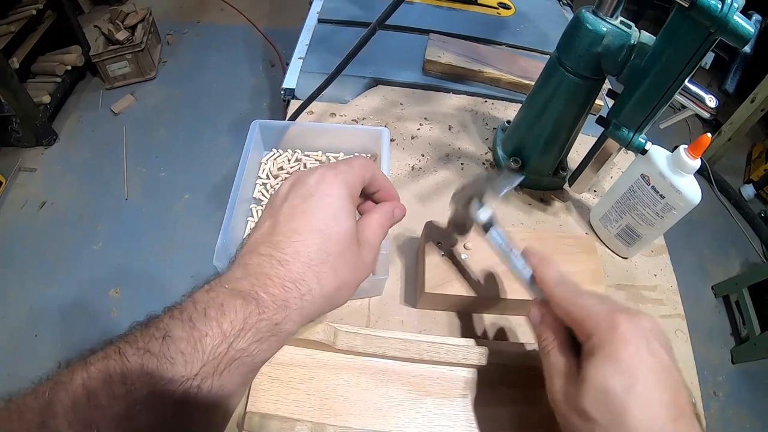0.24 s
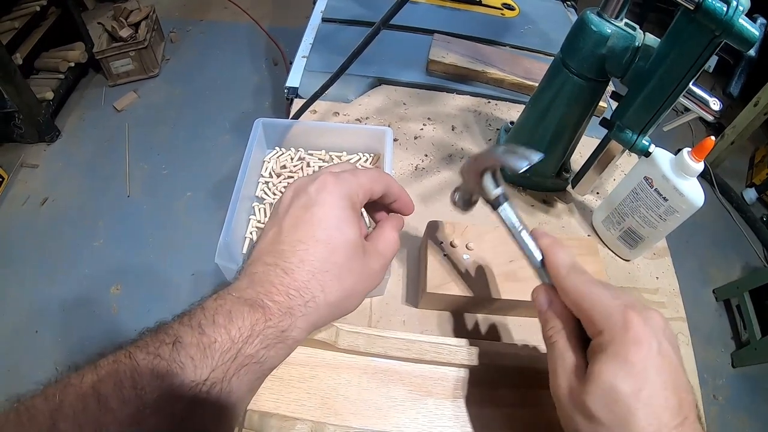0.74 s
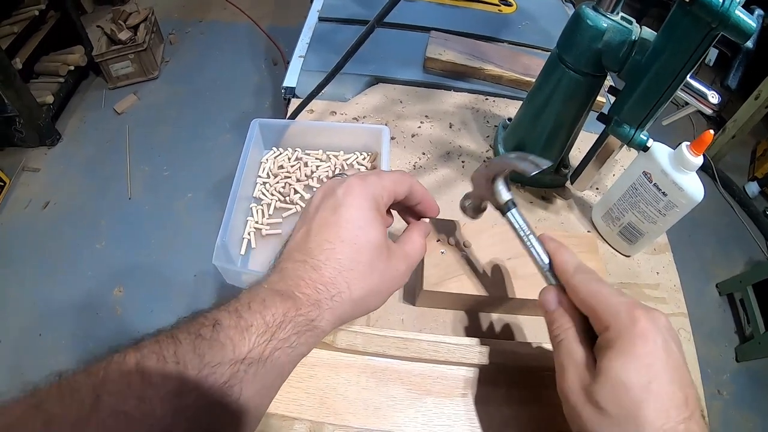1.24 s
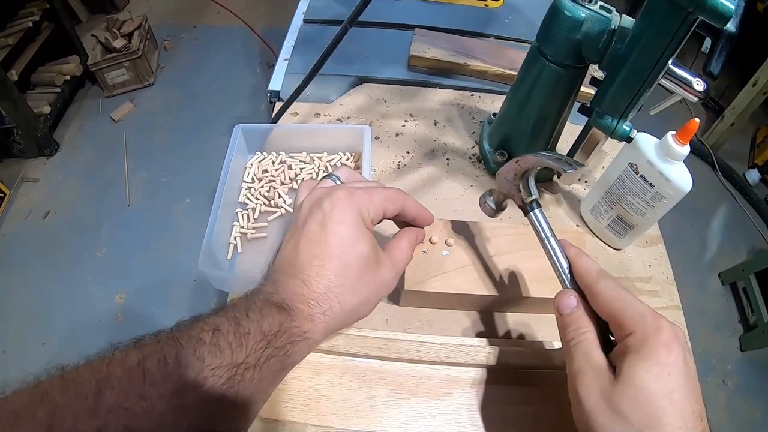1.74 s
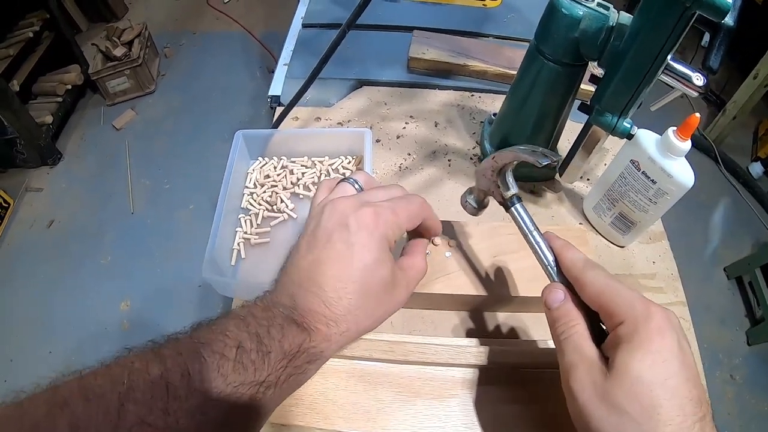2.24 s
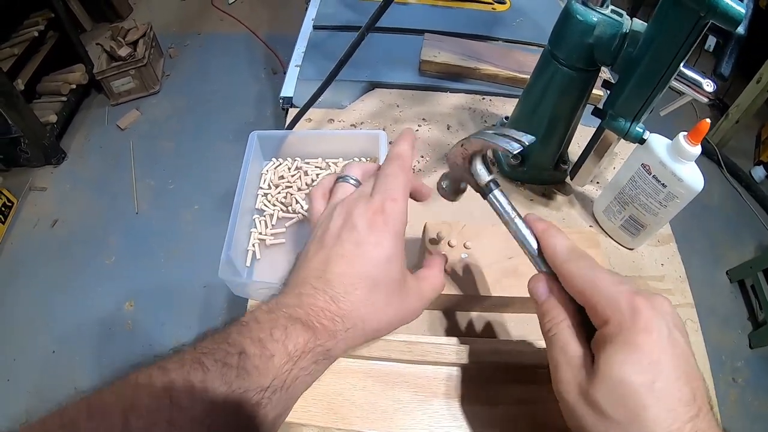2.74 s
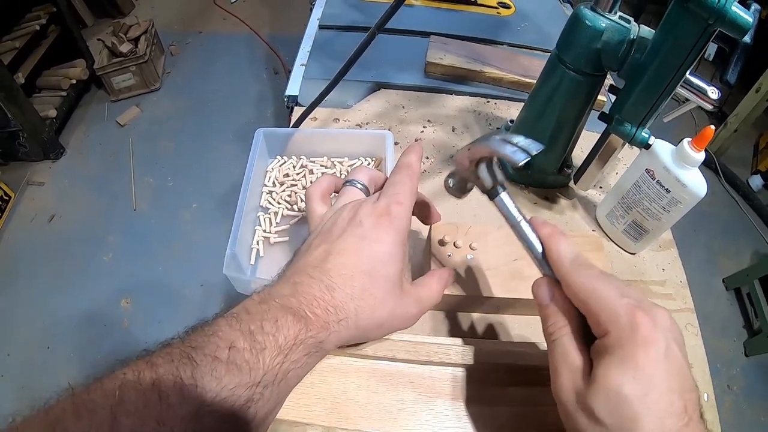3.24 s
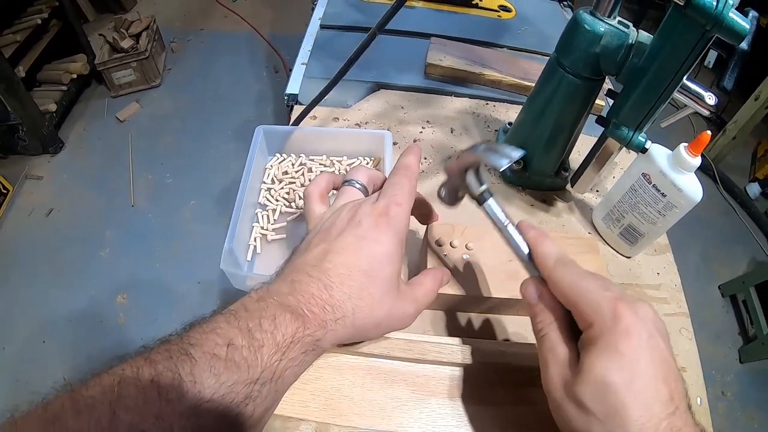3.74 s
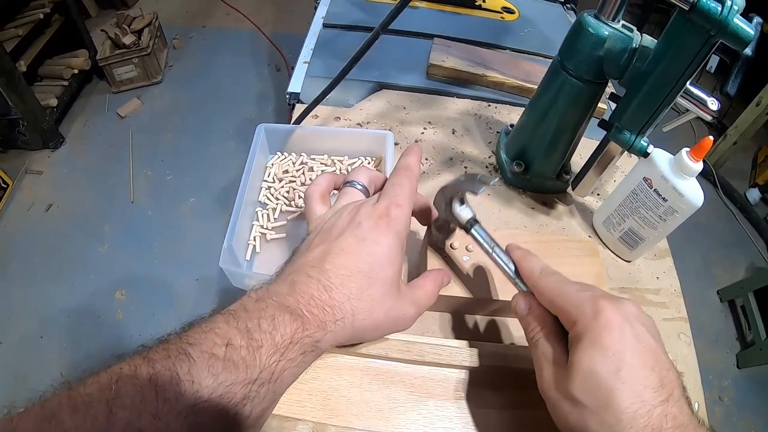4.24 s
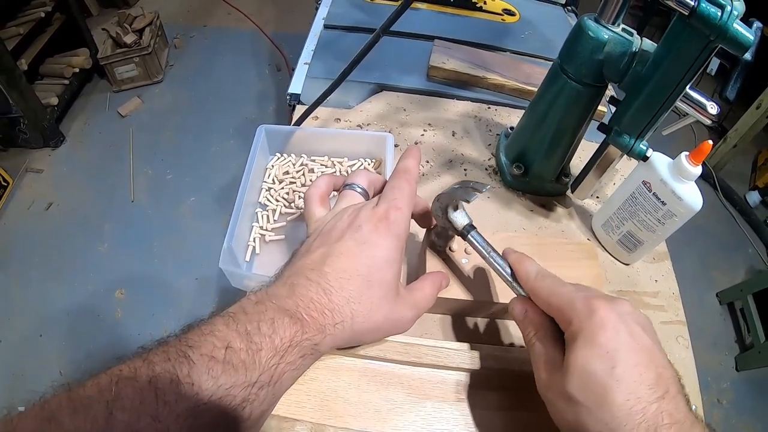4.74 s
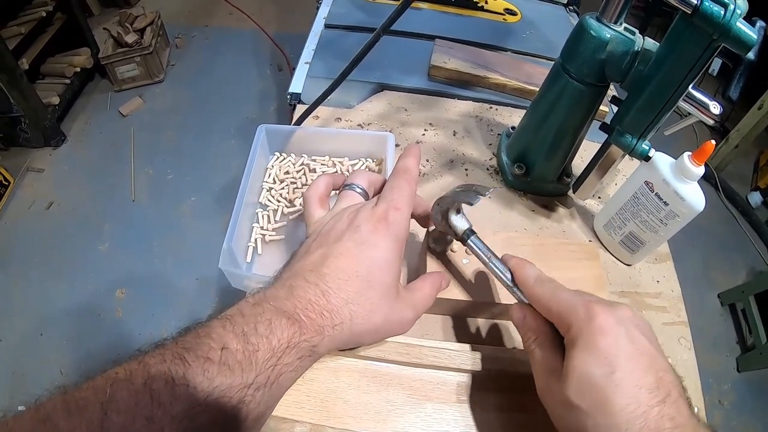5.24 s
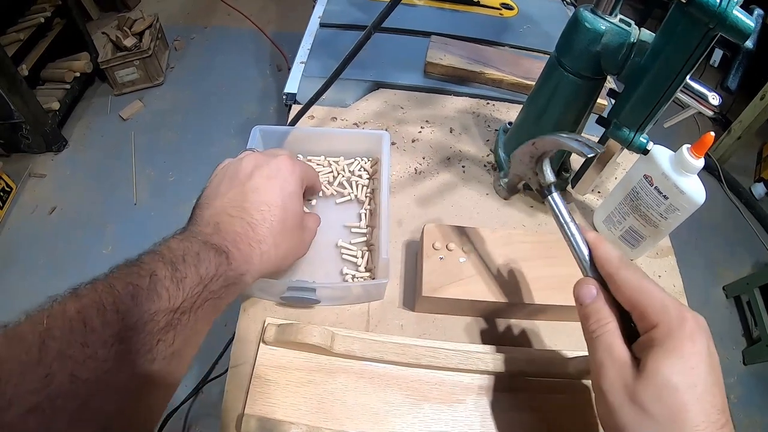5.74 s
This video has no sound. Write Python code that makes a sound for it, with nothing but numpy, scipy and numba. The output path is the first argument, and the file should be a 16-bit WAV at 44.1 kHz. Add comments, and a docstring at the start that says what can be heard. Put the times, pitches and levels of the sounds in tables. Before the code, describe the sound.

Quick steady hammer knocks on wooden pegs, a pause of low motor hum, then a longer run and pegs clicking in a plastic tub.

```python
"""A steel hammer drives wooden pegs into a block on a workbench, in two quick runs of blows.
Each blow excites damped modes of peg and block (crack), of bench and legs (thud), and a diffuse shop reverberation.
Loose pegs rattle after some blows, others click in a plastic tub, and motor lines hum over the hiss of moving air.
A head-worn microphone pair hears it; its automatic gain ducks at the blows and creeps back up in the pause."""
import sys
import numpy as np
from scipy import signal
from scipy.fft import rfft, irfft
from scipy.io import wavfile
from scipy.ndimage import uniform_filter1d
from numba import njit

SR = 44100
rng = np.random.default_rng(int(sys.argv[2]) if len(sys.argv) > 2 else 0)


def waveform_to_disk(signal):
    """Save audio, clipped to [-1, 1], as 16-bit WAV at the path in sys.argv[1]."""
    frames = np.transpose(np.atleast_2d(signal))
    scaled = np.clip(frames, -1, 1) * 32767
    samples = np.round(scaled).astype(np.int16)
    wavfile.write(sys.argv[1], SR, samples)


N = 264600
T = np.arange(int(.7 * SR)) / SR  # time axis of one blow, s
F = np.fft.rfftfreq(N, 1 / SR)

# Hammer blows, the first before the start, the seventh soft with a bounce:
# [t/s, strength level/dB, sharpness of the crack/dB, boom near 100 Hz/dB, thump near 320 Hz/dB, body near 450 Hz/dB,
# wood near 750 Hz/dB, knock near 1.4 kHz/dB, tick near 4.5 kHz/dB, rattle level/dB, swell of the rattle/s]
BLOWS = [(-0.233, 1, 0, 10, 6, 7, 2, 0, 1, -40, .03),
         (0.0312, 4, 1.5, 5, -2, -1, 1.5, 1.5, -5.5, -46.5, 0.027),
         (0.2969, 3.5, 2, -4.5, 1.5, -1.5, 2.5, 1.5, -4.5, -31, .03),
         (0.5622, 3.5, 1.5, 2.5, 0, -1, 2.5, 1.5, -4.5, -33, .03),
         (0.8232, 5.5, 3.5, -1.5, 4, 2.5, 7, -2, -9.5, 1.5, 0.061),
         (1.0913, 2.5, 3, 3.5, 3, 6, 8.5, 3, -8, 0, 0.051),
         (2.6068, -8.5, -6, 19, 12, 0, 6.5, -8.5, -10, -17.5, 0.003),
         (2.6207, -7, 7.5, 1, 12, 1.5, 1.5, -6.5, -7.5, -8, 0.014),
         (2.8678, 1, -1, 15, 7, 3, 6, -1, -4, 2.5, 0.024),
         (3.124, 3, 0.5, 13, -4, 3.5, 1.5, 0.5, -3, -24, .03),
         (3.386, 2.5, 2, 6.5, -1.5, 3, -0.5, 1.5, -2, -29, .03),
         (3.6384, 3, 1.5, 13, 1, -1.5, 4, 0.5, -2, -49, 0.036),
         (3.897, 3.5, 1.5, 8, 2.5, -0.5, 3.5, 2, -1.5, -36, .03),
         (4.161, 4, 1.5, 0, 4.5, -1, 2, 1.5, -1.5, -54.5, .03),
         (4.4242, 3.5, 2.5, -2, 4, 0, -0.5, 2, -3, -57, 0.033),
         (4.681, 3, 2, -1, 5.5, 2.5, 0, 2, -3, -41.5, .03),
         (4.9444, 2.5, 4.5, 2, 5.5, 4, 9.5, 1, -5, -9.5, 0.087),
         (5.2134, 3, 6, -2.5, 0, 4.5, 6.5, 4.5, -8, 1.5, 0.072),
         (5.4758, -7.5, 5.5, -10, 8.5, 7.5, 7.5, 3.5, -27.5, -14, 0.017)]
# Modes of block and hammer head: [f/Hz, level/dB, t60/s, left minus right/dB, change with the first peg/dB]
BLOCK = [(455, -2.5, 0.012, 1, -0.5), (574, -9, .01, -1.5, 7.5), (741, -1, 0.013, 1, 3),
         (1145, 2.5, 0.0095, 3.5, 1), (1453, 4, 0.021, -4, -1), (1728, 2.5, 0.015, 1.5, 2.5),
         (1858, -5, 0.014, -1, 1), (2294, -13, 0.028, -5.5, 3.5), (2938, -6, 0.014, -3.5, 3),
         (3316, -1.5, 0.01, -2, 1), (3787, -8.5, 0.013, -5, 4), (4140, -3.5, 0.012, -5.5, -4.5),
         (4373, 5.5, 0.0078, 1, -8), (5716, -16, 0.0099, -9.5, 0.5), (6230, -16.5, 0.01, 8.5, 2),
         (6920, -7.5, 0.0055, 11.5, -2.5), (7920, -16, 0.01, 12, 6), (10420, -13, 0.015, -11.5, -8.5),
         (10020, -20.5, 0.01, -14.5, -2.5), (13730, -15.5, .01, -12, -8.5)]
# Modes of the bench top and legs: [f/Hz, level/dB, t60/s before the damping by a seated peg, left minus right/dB]
BENCH = [(96.3, -38.5, 0.66, 11), (126, -35.5, 0.24, 9), (147, -1.5, 0.061, -2), (195, -19.5, 0.24, 13),
         (212.6, -10, 0.15, 3), (229.4, -28, 0.5, -22), (246, -4.5, 0.12, -8.5), (250.6, -0.5, 0.18, 7),
         (279, -16.5, 0.22, -13), (313, -7.5, 0.19, 0.5), (338.7, -22, 0.44, -3), (413, -11.5, 0.089, -1.5),
         (454.4, -0.5, 0.098, -1.5), (516, -27.5, 0.44, -9.5), (540.4, -16.5, 0.3, 1),
         (666.7, -20.5, 0.25, -6), (786, -37.5, 0.39, -4), (913, -32.5, 0.4, -16), (1027, -44, 0.61, -6.5),
         (1500, -38.5, 0.47, 1)]
# Late swing of legs and floor against the top: [f/Hz, level/dB, t60/s, left minus right/dB]
LEGS = [(49.3, -10.5, 0.29, 3), (150.5, 0, 0.24, 2), (238.4, -18, 0.42, 3.5)]
# Shop reverberation in bands: [f/Hz, level/dB, t60/s, likeness of left and right/0-1]
SHOP = [(63.5, -48, 0.78, 0.5), (130, -23.5, 0.3, 0.97), (240, -26.5, 0.49, 0.89), (436, -23.5, 0.32, 1),
        (736, -31, 0.38, 0.07), (1120, -20, 0.077, 0.6), (1333, -26, 0.33, 0.36), (2285, -31.5, 0.32, 0.68),
        (3120, -29.5, 0.29, 0.94), (4100, -43, 0.064, 0.95), (6340, -34.5, 0.28, 0.16),
        (8860, -45.5, 0.15, 0.3), (13000, -61.5, .15, .1)]
# Tools and fittings on the bench that sing on in the tail: [f/Hz, level/dB, t60/s, width/Hz]
FITTINGS = [(963, -37, 0.33, 40), (1020, -35, 0.33, 130), (1496, -38, 0.39, 46), (1645, -37, 0.32, 19),
            (1920, -49, 0.2, 40), (2284, -36, 0.39, 87), (2590, -53, 0.14, 60), (2670, -57, .3, 40),
            (3274, -38.5, 0.33, 33), (4360, -37.5, .27, 110)]
# Pegs clicking in the plastic tub: [t/s, level/dB, decay time/s, f/Hz]
PEGS = [(1.925, -48, 0.0022, 6500), (2.741, -27, 0.0037, 7000), (5.366, -15, 0.0013, 5950),
        (5.388, -31, .002, 5000), (5.434, -34, .002, 5500), (5.494, -18, 0.0054, 5500),
        (5.826, -12.5, 0.0015, 2890), (5.835, -28.5, 0.0023, 5400), (5.846, -26.5, 0.002, 3520),
        (5.852, -35, .003, 4000), (5.91, -26.5, 0.011, 2500), (5.915, -31.5, 0.0049, 5370),
        (5.922, -23.5, 0.011, 4060), (5.928, -21, 0.005, 4070), (5.936, -20, 0.02, 1670),
        (5.939, -32.5, 0.0033, 5700), (5.946, -18, 0.0028, 3100), (5.947, -25, 0.0027, 5530),
        (5.953, -36, 0.0036, 4500), (5.967, -36, 0.0057, 3500)]
# Motor lines: [f/Hz, flutter width/Hz, level/dB, steady share of the power/0-1]
HUM = [(98.5, 3.2, -37, 1), (272, 150, -50.5, 1), (300, 12, -51, 0), (348, 16, -62, 0.7),
       (363, 8.3, -45.5, 0.45), (740, 14, -61, 0), (2410, 220, -57, 0.2)]
# Spectral shape of the air hiss: [f/Hz, relative level per Hz/dB]
AIR = [(15, -40), (30, -5), (52, 7), (80, 9.5), (130, 0.5), (250, 3.5), (400, 0), (700, -7), (1500, -13.5),
       (2100, -16), (3500, -22.5), (5000, -27.5), (8000, -43), (12000, -51.5), (22000, -84.5)]

CRACK_DB, GRIT_DB, THUD_DB, SHOP_DB = 11, -3.5, 14, 23.5  # layers of a blow of strength 0
SECOND_PEG_S = 2.  # blows after this time strike the second peg
EDGE_DB = [0.5, -1]  # treble above 7 kHz with the first and the second peg
BLOCK_SPREAD, BENCH_SPREAD = (1.5, .006), (1.2, .002)  # change from blow to blow (dB, share of pitch)
BLOCK_RISE_S, BLOCK_RISE_SLOPE = 0.0016, 0.21  # build-up at 3 kHz; lower modes build more slowly
KNOCK_BAND_HZ, KNOCK_SLOWING = (950, 2100), 1.736  # bending modes build this many times more slowly
# a faint low-passed copy of the crack, mixed in 9.5 ms before each blow
EARLY_COPY_S, EARLY_COPY_DB, EARLY_COPY_HZ = 0.0095, -20, 750.
BLOCK_ECHO_S, BLOCK_ECHO_DB = 0.001558, -30  # the crack returns off the bench top
BENCH_LAG_S = 0.002087  # the bench takes up the blow after the block
BENCH_RISE_S, BENCH_RISE_SLOPE = 0.0019, 3.1  # build-up at 250 Hz and above, for 0 dB of knock
SOFT_SLOWING = 0.54  # dB of slower rise in the bench per dB of knock lost
SEATED_DAMPING = 0.11  # dB of shorter ring in the bench per dB of wood: a seated peg passes the blow on dead
LEGS_RISE_S = 0.035
SHOP_RISE_S, SHOP_FRESH = 0.0078, 0.46  # build-up; power share of the answer that is new at each blow
RATTLE_PER_S, RATTLE_LAG_S = 2500, 0.0029  # click density; the pegs jump once the bench moves
RATTLE_HZ, RATTLE_REF_S = 4030, 0.0076  # centre of a rattle whose swell lasts RATTLE_REF_S
RATTLE_SAG = 0.47  # a longer rattle is a lower one
RATTLE_PEAKING = 2.47  # a higher value holds the rattle back and ends it sooner
RATTLE_FLOOR_DB = -45  # fainter rattles are left out
BUZZ_DB = -11  # the fittings buzz along with the rattle
PEG_CLICKS_PER_S, PEG_SCRAPE = 2000, .35  # click density; steady scrape between the clicks
PEG_RISE_S, PEG_TAIL_S, PEG_TAIL_DB = 0.00024, 0.03, -16  # the tub and the shop carry each click on
PEG_Q, PEG_SNAP_DB = 3.7, -17.5  # narrowness of the peg's note; broad snap of the contact
AIR_DB = -42  # rms level of the part common to both channels
MONO_HZ = 350.  # below this the two microphones hear nearly the same
MIC_DROOP_HZ, TOP_HZ, OVERLOAD = 9950, 16200, .8


def hammer():
    """Impact excitation: each blow drives block, bench and shop, whose answer is partly the same each time."""
    out = np.zeros((2, N))
    usual, other, third = [np.concatenate([shop_bands(), fitting_bands()]) for _ in range(3)]
    for s, db, sharp_db, boom, thump, body, wood, knock, tick, _, _ in BLOWS:
        first_peg = s < SECOND_PEG_S
        edge_db = EDGE_DB[int(s > SECOND_PEG_S)]
        tone = (boom, thump, body, wood, knock, tick, edge_db)
        crack = undb(db) * block_crack(sharp_db, first_peg, tone)
        early_copy = signal.lfilter(*signal.butter(2, EARLY_COPY_HZ, fs=SR), crack)
        add(out, s - EARLY_COPY_S, undb(EARLY_COPY_DB) * early_copy)
        add(out, s, crack)
        add(out, s + BLOCK_ECHO_S, undb(BLOCK_ECHO_DB) * crack)
        add(out, s + BENCH_LAG_S, undb(db + THUD_DB) * bench_thud(tone))
        turn = 2 * np.pi * rng.random()  # a new mixture of two spare answers
        fresh = np.cos(turn) * other + np.sin(turn) * third
        shop = np.sqrt(1 - SHOP_FRESH) * usual + np.sqrt(SHOP_FRESH) * fresh
        band_gain = undb(db + SHOP_DB + colour_db(SHOP + FITTINGS, *tone))
        add(out, s, np.tensordot(band_gain, shop, 1))
    return out


def block_crack(sharp_db, first_peg, tone):
    """Modal superposition: the short modes of block and head, with treble noise as fibres crush."""
    peg_db = np.array(BLOCK)[:, 4] * first_peg
    modes = shifted(BLOCK, peg_db + colour_db(BLOCK, *tone))
    crack = undb(sharp_db + CRACK_DB) * ring(modes, .07, block_rise_s, *BLOCK_SPREAD, steepness=2.8)
    *_, tick_db, edge_db = tone
    envelope = np.exp(-T / 0.0045) * (1 - np.exp(-(T / 0.0012) ** 2))
    return crack + undb(GRIT_DB + edge_db + 1.3 * tick_db) * grit() * envelope


def block_rise_s(hz):
    """Modal build-up time: the treble tick comes first, the knock of the block follows."""
    knock = (hz > KNOCK_BAND_HZ[0]) & (hz < KNOCK_BAND_HZ[1])
    return BLOCK_RISE_S * (3000 / hz) ** BLOCK_RISE_SLOPE * np.where(knock, KNOCK_SLOWING, 1)


def grit():
    """Incoherent fracture noise: a treble band, unrelated left and right."""
    return bandpass(5000, 11000, rng.standard_normal((2, len(T))))


def bench_thud(tone):
    """Inertia and damping: the heavy top is slow to move, and legs and floor swing against it late."""
    _, _, _, wood_db, knock_db, _, _ = tone
    modes = shifted(BENCH, colour_db(BENCH, *tone))
    modes[:, 2] *= undb(-SEATED_DAMPING * wood_db)
    base_s = BENCH_RISE_S * undb(-SOFT_SLOWING * knock_db)

    def bench_rise_s(hz):
        """Modal inertia: below 250 Hz the build-up lengthens."""
        return base_s * np.maximum(250 / hz, 1) ** BENCH_RISE_SLOPE

    top = ring(modes, 0.7, bench_rise_s, *BENCH_SPREAD)
    return top - ring(LEGS, 0.25, lambda hz: LEGS_RISE_S, *BENCH_SPREAD)


def ring(modes, contact_ms, rise_s, scatter_db, detune, steepness=2.03):
    """Damped free vibration convolved with a half-sine contact force; every blow lands a little differently."""
    hz, db, t60, pan_db = np.array(modes).T[:, :, None]
    luck = rng.standard_normal((2, len(modes), 1))
    size = undb(db + scatter_db * luck[0])
    free = -size * np.sin(2 * np.pi * hz * (1 + detune * luck[1]) * T)
    free *= 1000. ** (-T / t60)
    free *= 1 - np.exp(-(T / rise_s(hz)) ** steepness)
    n = int(contact_ms * SR / 1000)
    push = np.sin(np.pi * (np.arange(n) + .5) / n)
    pair = undb(np.array([pan_db[:, 0], -pan_db[:, 0]]) / 2) @ free
    return signal.lfilter(push / push.sum(), 1, pair)


def colour_db(table, boom_db, thump_db, body_db, wood_db, knock_db, tick_db, edge_db):
    """Spectrum of the excitation: how much a blow, by peg and depth, feeds each frequency of a table."""
    hz = [50, 110, 150, 240, 320, 450, 750, 1200, 1600, 4500, 7500]
    db = [boom_db, boom_db, boom_db / 3, 0, thump_db, body_db, wood_db,
          knock_db, knock_db, tick_db, 1.25 * tick_db + edge_db]
    return np.interp(np.log(np.array(table)[:, 0]), np.log(hz), db)


def shifted(table, shift_db):
    """Linear scaling of modes: f/Hz, level/dB, t60/s and pan/dB with the levels shifted."""
    modes = np.array(table, float)[:, :4]
    modes[:, 1] += shift_db
    return modes


def shop_bands():
    """Diffuse-field decay: one fading noise per band, partly coherent between the channels."""
    bands = []
    for hz, db, t60, likeness in SHOP:
        noise = rng.standard_normal((3, len(T)))
        same, left, right = bandpass(hz / 1.35, hz * 1.35, noise)
        pair = np.sqrt(likeness) * same + np.sqrt(1 - likeness) * np.array([left, right])
        bands.append(fade(pair, db, t60))
    return np.array(bands)


def fitting_bands():
    """Sympathetic resonance: narrow wavering rings, shaken on by the bench."""
    bands = []
    for hz, db, t60, width_hz in FITTINGS:
        noise = rng.standard_normal((3, len(T)))
        same, left, right = signal.lfilter(*signal.iirpeak(hz, hz / width_hz, fs=SR), noise)
        bands.append(fade(same + 2.0 * np.array([left, right]), db, t60))
    return np.array(bands)


def fade(pair, db, t60):
    """Reverberant envelope: energy builds up, then decays exponentially."""
    return pair / pair.std() * undb(db) * (1 - np.exp(-T / SHOP_RISE_S)) * 1000. ** (-T / t60)


def rattle():
    """Random repeated impacts: dense tiny clicks of loose pegs swell and die after a blow."""
    out = np.zeros((2, N))
    top_db = max(row[1] for row in FITTINGS)
    for s, *_, db, swell in BLOWS:
        if db < RATTLE_FLOOR_DB:
            continue
        u = T / swell
        centre_hz = RATTLE_HZ * (RATTLE_REF_S / swell) ** RATTLE_SAG
        b, a = signal.iirpeak(centre_hz, 1.1, fs=SR)
        luck = rng.random((3, len(T)))
        hits = luck[0] < RATTLE_PER_S / SR
        clicks = hits * rng.standard_normal(len(T)) * np.sqrt(SR / RATTLE_PER_S)
        envelope = (u * np.exp(1 - u)) ** RATTLE_PEAKING
        jumps = undb(db) * envelope * clicks * np.sqrt(2 * luck[1:])  # each click has its own place
        buzz = 0
        for hz, fitting_db, _, width_hz in FITTINGS:
            peak = signal.iirpeak(hz, hz / width_hz, fs=SR)
            buzz = buzz + undb(fitting_db - top_db) * signal.lfilter(*peak, jumps)
        wood = signal.lfilter(b, a, signal.lfilter(b, a, jumps))
        add(out, s + RATTLE_LAG_S, wood + undb(BUZZ_DB) * buzz)
    return out


def pegs():
    """Resonant filtering of contact noise: bursts of sharp clicks, a woody note over a broad snap."""
    out, t = np.zeros((2, N)), T[:SR // 10]
    for s, db, length, hz in PEGS:
        hits = rng.random(len(t)) < PEG_CLICKS_PER_S / SR
        clicks = hits * np.sqrt(SR / PEG_CLICKS_PER_S) + PEG_SCRAPE
        envelope = clicks * np.exp(-t / length) + undb(PEG_TAIL_DB) * np.exp(-t / PEG_TAIL_S)
        burst = rng.standard_normal(len(t)) * (1 - np.exp(-t / PEG_RISE_S)) * envelope
        note = signal.lfilter(*signal.iirpeak(hz, PEG_Q, fs=SR), burst)
        add(out, s, undb(db) * (note + undb(PEG_SNAP_DB) * burst))
    return bandpass(900., 7500., out)


def machines():
    """Narrow-band modulation: motor lines, part steady and part fluttering, over the hiss of air."""
    return motor() + air()


def motor():
    """Complex-amplitude modulation: slow noise spreads each line about its frequency."""
    out = 0
    for hz, width_hz, db, steady in HUM:
        a, b = uniform_filter1d(rng.standard_normal((2, N)), int(SR / width_hz))
        flutter = (a + 1j * b) / a.std()
        size = np.sqrt(2 * steady) + np.sqrt(1 - steady) * flutter
        turns = hz * np.arange(N) / SR + rng.random()
        out = out + undb(db) * (size * np.exp(2j * np.pi * turns)).real
    return out


def air():
    """Turbulence noise: spectrally shaped hiss, alike left and right in the bass."""
    mid, side = irfft(rfft(rng.standard_normal((2, N))) * undb(on_log_hz(AIR)), N)
    side = signal.sosfilt(signal.butter(3, 450, "high", fs=SR, output="sos"), side)
    return undb(AIR_DB) / mid.std() * (mid + 0.83 * side * np.array([[1], [-1]]))


def scene():
    """Linear superposition of all sources."""
    return hammer() + rattle() + pegs() + machines()


def undb(db):
    """Logarithmic level law: level/dB to amplitude ratio."""
    return 10 ** (np.asarray(db) / 20)


def on_log_hz(table):
    """Logarithmic interpolation of an (f/Hz, value) table at every spectral line."""
    hz, value = np.transpose(table)
    return np.interp(np.log(F + 1), np.log(hz), value)


def bandpass(low_hz, high_hz, x):
    """Band limitation by a Butterworth filter."""
    return signal.sosfilt(signal.butter(2, [low_hz, high_hz], "band", fs=SR, output="sos"), x)


def add(out, s, x):
    """Superposition: mix x into out from time s."""
    i = int(s * SR)
    x = x[..., max(-i, 0):N - i]
    start = max(i, 0)
    out[..., start:start + x.shape[-1]] += x


@njit
def duck(level_db, limit_db, share, depth_db, attack_s, release_s, start_db):
    """Feed-forward gain in dB: drops by a share of the excess over the limit, down to a depth, and recovers."""
    gain, g = np.empty(len(level_db)), start_db
    for i in range(len(level_db)):
        aim = max(depth_db, min(0., share * (limit_db - level_db[i])))
        g += (aim - g) / (SR * (attack_s if aim < g else release_s))
        gain[i] = g
    return gain


def loudness_db(x, window_s):
    """Mean-square averaging: running level of both channels in dB, over the moment just past."""
    n = int(window_s * SR)
    return 10 * np.log10(signal.lfilter(np.ones(n) / n, 1, np.mean(x ** 2, 0)).clip(1e-12))


def record(dry):
    """Transduction by a close microphone pair: bass and treble cut, slow gain rider, quick compressor, overload."""
    side_filter = signal.butter(3, MONO_HZ, "high", fs=SR, output="sos")
    side = signal.sosfiltfilt(side_filter, dry[0] - dry[1]) / 2
    pair = dry.mean(0) + side * np.array([[1], [-1]])
    pair = signal.sosfilt(signal.butter(2, 85., "high", fs=SR, output="sos"), pair)
    pair = signal.sosfilt(signal.butter(3, MIC_DROOP_HZ, fs=SR, output="sos"), pair)
    rider_db = duck(loudness_db(pair, 0.0034), -40.0, 0.79, -18.0, 0.07, 1.0, -17.0)
    ridden = pair * undb(rider_db)
    press_db = duck(loudness_db(ridden, 0.0063), -37.5, 0.39, -20.0, 0.0036, 0.011, 0.)
    pressed = ridden * undb(press_db)
    soft = np.tanh(OVERLOAD * pressed) / OVERLOAD
    return signal.sosfilt(signal.ellip(10, .2, 90, TOP_HZ, fs=SR, output="sos"), soft)


dry = scene()
out = record(dry)
waveform_to_disk(out)
```